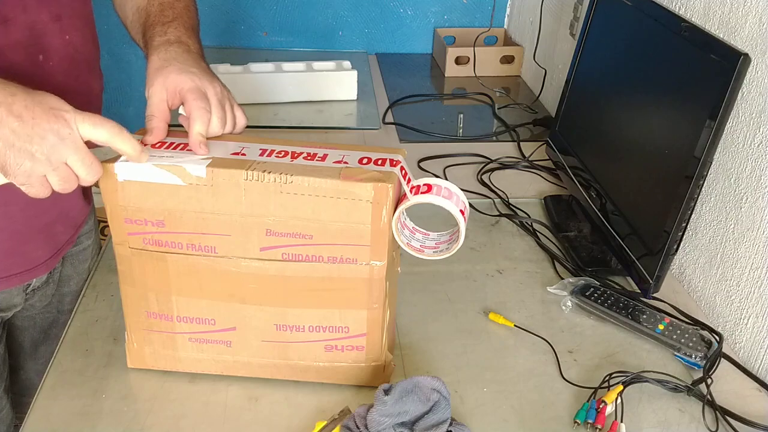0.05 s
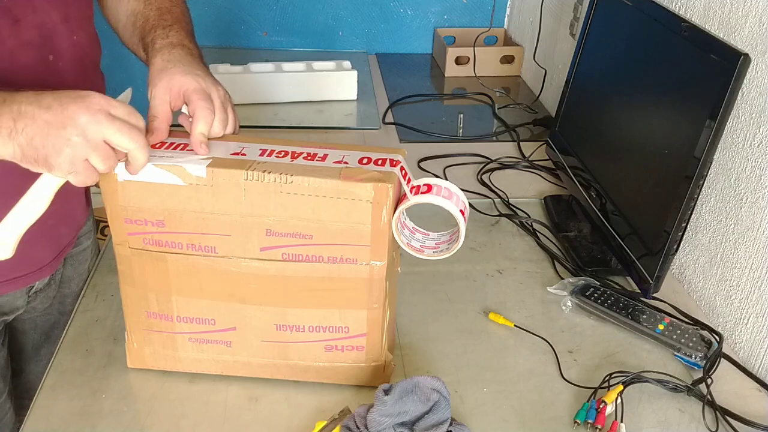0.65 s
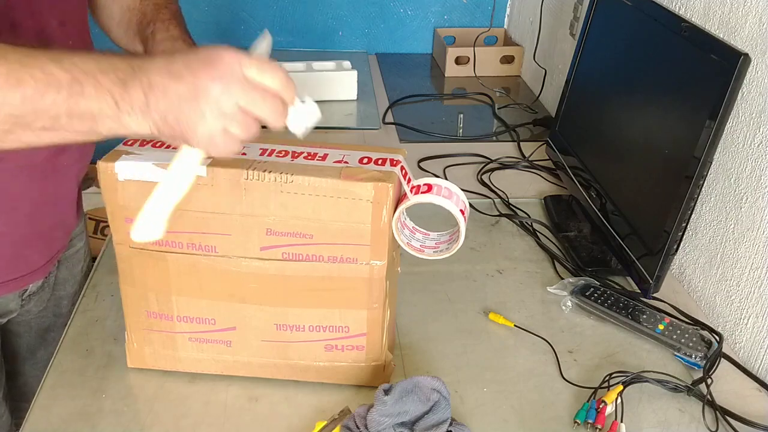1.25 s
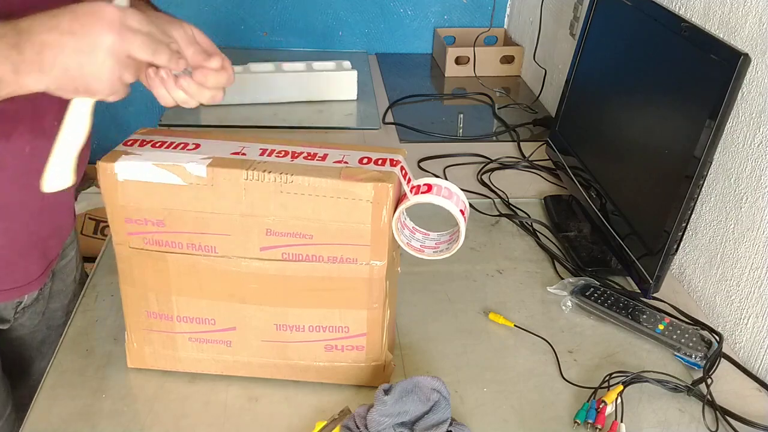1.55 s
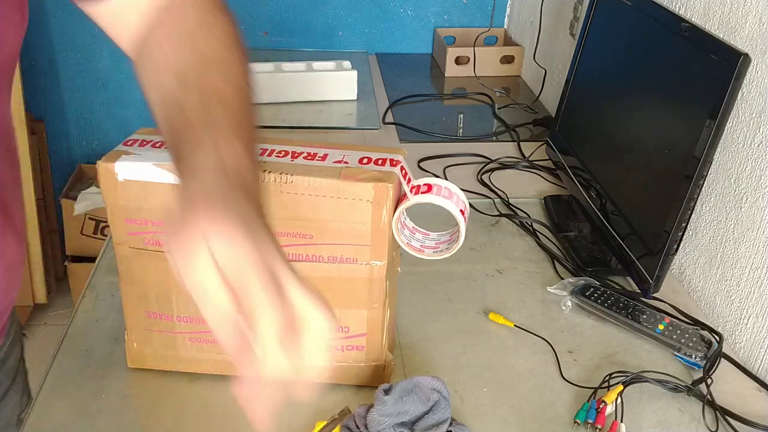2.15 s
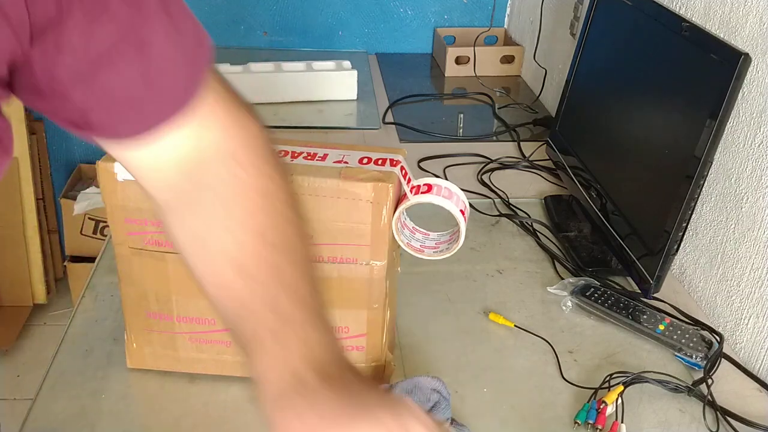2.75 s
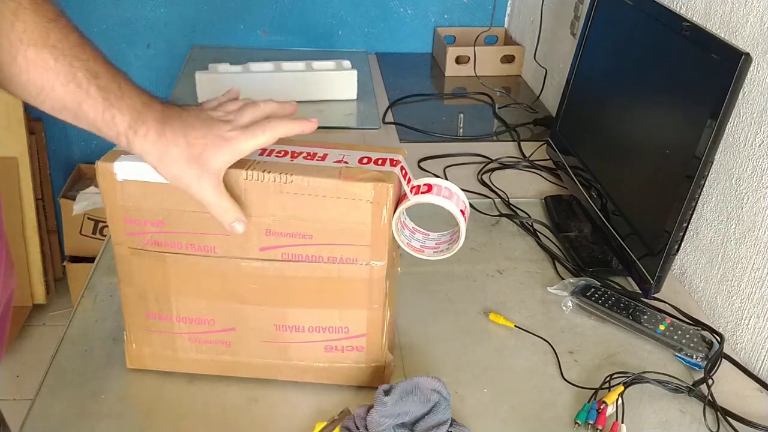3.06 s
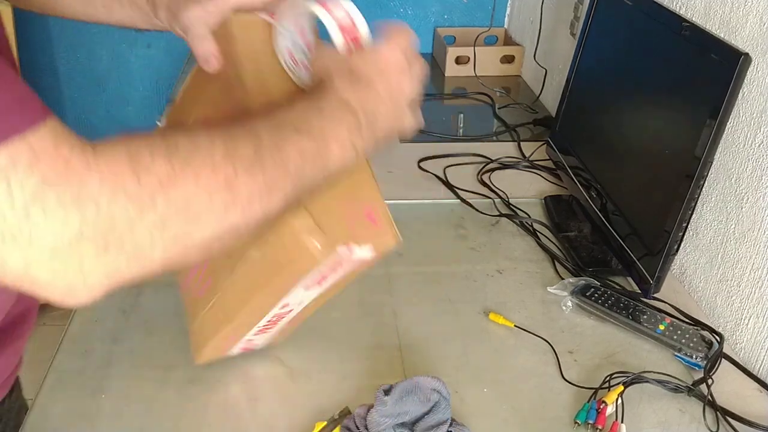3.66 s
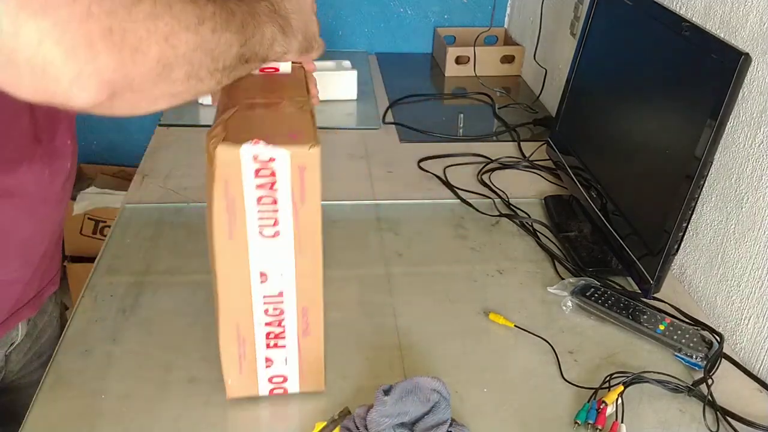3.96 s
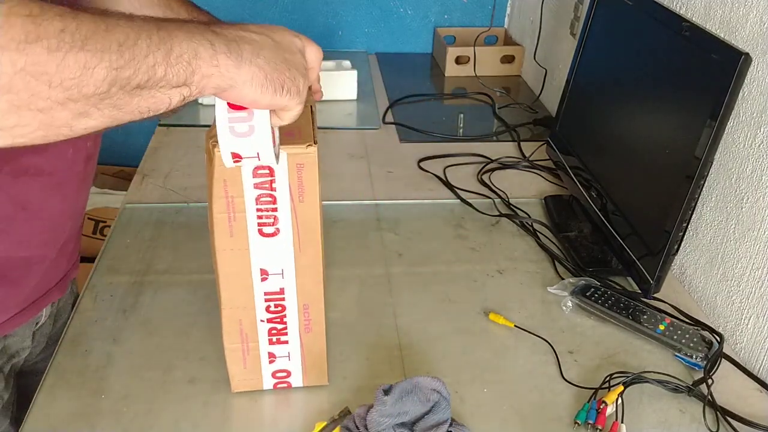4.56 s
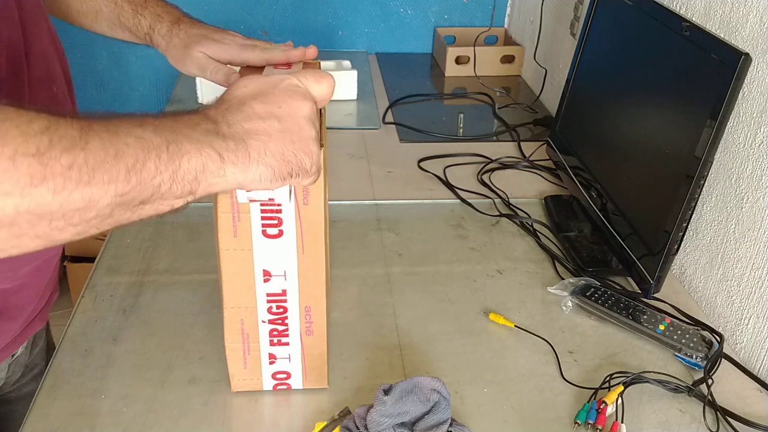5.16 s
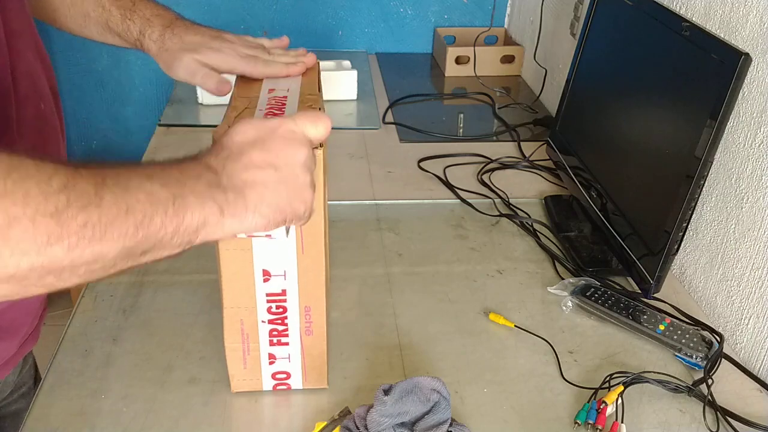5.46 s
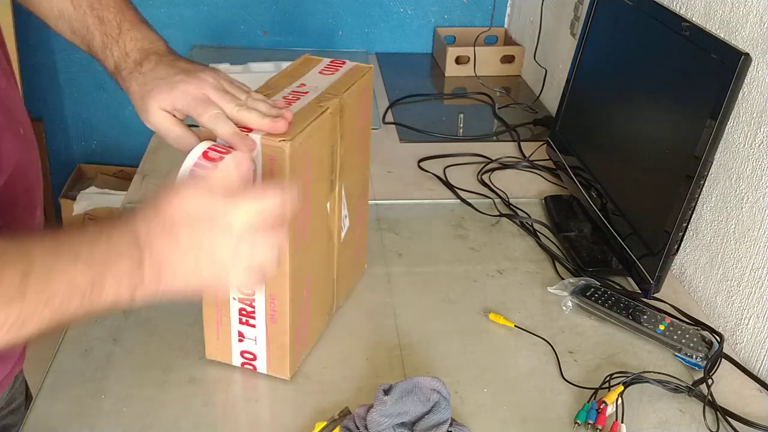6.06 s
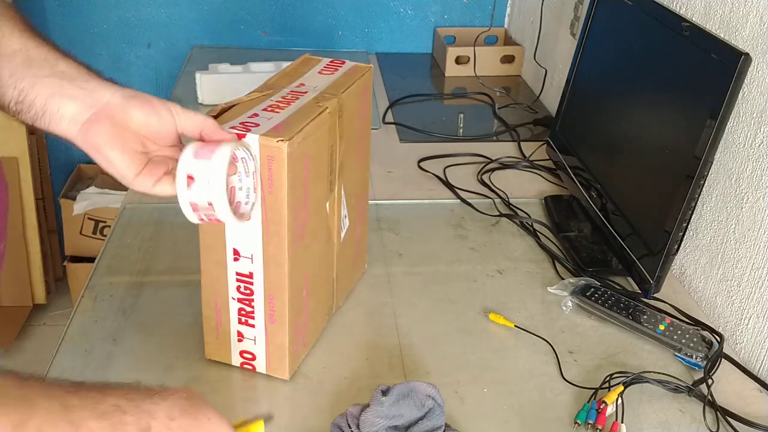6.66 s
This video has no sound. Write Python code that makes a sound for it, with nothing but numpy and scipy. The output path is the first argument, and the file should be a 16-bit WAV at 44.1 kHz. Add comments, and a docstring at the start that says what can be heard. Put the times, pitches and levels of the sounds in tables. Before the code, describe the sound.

Close up in a small room with a faint hush, hands rub lightly on a cardboard box, and a barely audible distant tone sinks at about 0.5 seconds. Packing tape peels softly around 1 second. From 1.5 seconds a cutter scrapes faintly, clicks at 2.2, then clatters and slides on the table between 2.7 and 3.3. The box is lifted and handled with hollow bumps and rustles from 3.4 to 4. The tape then comes off its roll in a loud half-second rasp that rises in pitch. Hands press and rub it onto the card until about 5. Short, sharp rips come at 5.1, 5.2 and 5.6. The box drags with a brief low judder around 5.7, followed by another squealing tape pull until 6.1. Softer rubbing, crisp snaps and two small rips continue to about 6.8 seconds.

```python
"""A table in a small room: packing tape is picked at, peeled off its roll and pressed onto a cardboard box.
Glue lets go in dense tiny slips and sharp snaps; each shakes the box air, its panels and the tape film.
Hands rub the card. A cutter scrapes and clatters; the box is lifted and judders over the table top.
Behind: a faint far tone and room hush. Heard from close by through two spaced ports."""
import sys
import numpy as np
from scipy import signal
from scipy.fft import rfft, irfft, next_fast_len
from scipy.io import wavfile

SR = 44100
rng = np.random.default_rng(int(sys.argv[2]) if len(sys.argv) > 2 else 0)


def pcm_store(signal):
    """Save signal as 16-bit PCM."""
    levels = np.round(np.clip(np.atleast_2d(signal), -1, 1) * 32767)
    wavfile.write(sys.argv[1], SR, levels.astype(np.int16).T)


N = 300315
TIME_S = np.arange(N) / SR

# Levels are relative. air, panel, film: drive into box air, box panels, tape film.
# Tape pulls: start/s, end/s, air/dB, panel/dB, film/dB, swell/(dB/s), sizzle/dB
TAPE_PULLS = [(0.911, 1.232, -54.5, -49, -56.5, 7, 13.5), (3.97, 4.479, -42.5, -30.5, -31, 1, 4),
              (5.113, 5.168, -34, -30.5, -34, -62, 5), (5.188, 5.246, -38, -27, -31, -87, 2.5),
              (5.557, 5.622, -39, -48, -40.5, -80, 6.5), (5.831, 5.909, -47, -37, -35, -30, 6.5),
              (5.926, 6.089, -50, -40.5, -34, 33, -3), (6.605, 6.662, -45.5, -39, -37, -78, 5),
              (6.779, 6.82, -43, -33.5, -37.5, 0, 8.5)]
# Rasps of taut tape or sliding cutter: start/s, end/s, f_start/Hz, f_end/Hz, half-width/Hz, level/dB
RASP_GLIDES = [(0.0, 0.155, 632, 571, 110, -63.5), (0.374, 0.388, 1180, 1127, 120, -45),
               (0.923, 1.23, 1012, 1062, 222, -44.5), (1.59, 1.625, 1200, 1097, 152, -52),
               (1.819, 1.923, 1638, 1800, 180, -56), (2.007, 2.217, 1260, 1413, 130, -67),
               (2.32, 2.538, 1595, 1472, 168, -65), (2.328, 2.537, 3100, 2910, 262, -62),
               (3.962, 4.026, 519, 477.5, 91, -33), (4.017, 4.172, 598, 1001, 109, -34.5),
               (4.164, 4.482, 1148, 1414, 240, -38.5), (4.199, 4.499, 3050, 3250, 402, -38.5),
               (4.935, 5.043, 873, 880, 90.5, -54), (5.19, 5.244, 1074, 949, 171, -30.5),
               (5.553, 5.626, 1450, 1330, 282, -31), (5.85, 6.028, 1396, 1498, 376, -34),
               (5.934, 6.003, 3475, 3020, 190, -36), (6.015, 6.088, 2573, 2754, 110, -31.5),
               (6.028, 6.096, 3150, 3013, 150, -35.5), (6.503, 6.555, 589, 590, 50, -43.5)]
# Tape snaps: t/s, air/dB, panel/dB, film/dB, f_spot/Hz
TAPE_SNAPS = [(0.374, -56.5, -45, -60, 1162), (1.2241, -47, -39, -41, 1400), (1.864, -80, -74, -46.5, 1690),
              (3.0351, -58, -44, -29.5, 1260), (3.1262, -32, -24, -32, 1113),
              (3.458, -55, -40.5, -51.5, 592), (3.7308, -65, -32.5, -36, 610),
              (3.7932, -31, -37.5, -50, 490), (3.8869, -38, -23, -33.5, 651),
              (3.9625, -25.5, -24.5, -38, 565), (4.0039, -52, -29.5, -53, 507),
              (4.6166, -37.5, -58, -50, 517), (4.7121, -36.5, -51, -55, 427),
              (4.7816, -58, -51, -35.5, 1200), (5.1172, -50, -25, -32.5, 890),
              (5.1893, -41, -27.5, -32.5, 1267), (5.392, -75, -52, -43, 2950),
              (5.5494, -42, -26.5, -27.5, 1673), (5.5641, -58, -28.5, -30, 1330),
              (5.8331, -60, -34, -30, 1400), (5.8611, -66, -30, -31, 1230),
              (5.9295, -37.5, -26.5, -27, 1714), (5.972, -58, -27.5, -30, 1217),
              (6.0172, -49, -42, -28.5, 2710), (6.32, -48, -41.5, -41.5, 617),
              (6.5099, -64, -42, -28.5, 580), (6.5973, -43.5, -35, -29.5, 1156),
              (6.7222, -65, -40, -42.5, 894), (6.7487, -56, -57, -35, 3160),
              (6.7785, -44, -37.5, -29, 1240)]
# Hand strokes: t_peak/s, rise/s, fall/s, air/dB, panel/dB, film/dB
HAND_RUBS = [(0.005, 0.03, 0.073, -52.5, -56, -66), (0.305, 0.013, 0.085, -69, -73, -66.5),
             (0.676, 0.014, 0.02, -66, -56, -56), (0.798, .025, 0.048, -66, -50.5, -55.5),
             (0.87, 0.052, 0.24, -58, -56, -62.5), (1.338, 0.018, 0.028, -66, -47.5, -61),
             (2.165, 0.045, .08, -90, -76, -64), (2.345, .03, 0.059, -86, -60, -56.5),
             (3.075, 0.052, 0.036, -58, -51, -38), (3.466, 0.013, 0.075, -41, -51, -74),
             (3.504, 0.075, 0.14, -59, -49.5, -56), (3.811, 0.093, 0.053, -40.5, -44, -57),
             (3.92, 0.069, 0.057, -49, -41, -48), (4.52, 0.031, 0.082, -52.5, -44, -64),
             (4.635, .04, 0.16, -42.5, -46.5, -45.5), (4.72, 0.066, 0.093, -45, -42.5, -50.5),
             (4.81, 0.035, 0.088, -49, -48, -72), (4.959, 0.012, 0.069, -70, -64, -64.5),
             (5.068, 0.026, .1, -63, -53, -55.5), (5.35, 0.044, 0.081, -61.5, -53.5, -77),
             (5.45, 0.056, 0.16, -64, -50, -53), (5.54, 0.032, 0.012, -46, -40, -51),
             (6.17, 0.14, 0.18, -62, -50.5, -58.5), (6.326, 0.076, 0.043, -53, -51.5, -55),
             (6.376, 0.014, 0.029, -45.5, -48.5, -72), (6.458, 0.033, 0.12, -50.5, -52.5, -65.5),
             (6.72, .04, 0.042, -53.5, -54, -55)]
# Cutter clicked shut and dropped: t/s, air/dB, panel/dB, film/dB, f_spot/Hz
CUTTER_CLACKS = [(1.594, -93, -56.5, -39.5, 3370), (1.7862, -74, -56, -39.5, 3170),
                 (2.2256, -48, -28.5, -27, 2523), (2.7559, -66, -40, -52, 740),
                 (2.7805, -34, -23, -25, 1283), (3.0053, -44, -19.5, -24, 1310),
                 (3.0116, -54, -21, -23.5, 1350), (3.1045, -38, -30, -28.5, 1140),
                 (3.1652, -47, -27, -33, 930), (3.2619, -45, -30, -43, 1140)]
# Cutter slides: start/s, end/s, air/dB, panel/dB, film/dB, swell/(dB/s)
CUTTER_SCRAPES = [(1.526, 1.69, -83, -86, -52, -53), (1.708, 1.91, -81, -74, -55, 0),
                  (1.974, 2.23, -91, -81.5, -75, 54), (2.105, 2.126, -92, -65.5, -45, -2),
                  (2.307, 2.518, -85, -65, -50, -82), (2.74, 2.784, -67, -45, -56, -1),
                  (2.886, 3, -61.5, -55, -64, -6), (3.011, 3.219, -48, -30.5, -43.5, -8),
                  (3.258, 3.28, -45.5, -39, -49, 0)]
# Box stick-slip: t/s, slip rate/Hz, level/dB
BOX_DRAG = [(5.659, 68.5, -50), (5.691, 66, -29), (5.719, 74, -28.5), (5.748, 63.4, -23.5),
            (5.772, 68.5, -31), (5.81, 68, -33), (5.826, 114, -38)]
# Modes of box air, panels and stretched film: f/Hz, width/Hz, level/dB
AIR_MODES = [(136.6, 16, -4.5), (155, 70, 14.5), (213, 59, 0), (234, 78, 2), (341.4, 91, -3),
             (444, 390, 3.5)]
PANEL_MODES = [(493, 37, -22), (617, 71, 6), (745, 150, 9), (1010, 640, 20.5), (1273, 88, 6),
               (1710, 120, 5.5), (1800, 410, -12.5), (2380, 2100, 6.5)]
FILM_MODES = [(2480, 830, 12.5), (2950, 1600, 1), (3650, 2470, 5.5), (5320, 5100, -4.5), (7600, 2700, -9),
              (10000, 960, -14.5), (13000, 3000, -23)]
# Room decay: f/Hz, t60/s
ROOM_T60 = [(150, 0.33), (500, 0.31), (1200, 0.28), (3000, 0.31), (7000, 0.31), (14000, 0.25)]
# Room hush spectrum: f/Hz, density/dB
HUSH_SPECTRUM = [(18, -53), (30, -10), (485, 4.5), (698, 4), (1200, -4.5), (2130, -15), (2920, -12),
                 (4310, -9.5), (5300, -13.5), (15000, -11.5)]
# Channel likeness in the bass, its ripple depth higher up: f/Hz, likeness/1
PORT_LIKENESS = [(60, 0.9), (150, 0.34), (300, 0.25), (550, 0.77), (1100, 1), (2200, 0.91), (4400, 0.88),
                 (6500, 0.73), (10000, 0.48), (15000, 0)]

AIR_BAND_HZ, PANEL_BAND_HZ, FILM_BAND_HZ = (88, 475), (263, 2254), (790, 13400)
BOX_LIFT_S, TOP_HZ = 3.42, 15900


def tape_peel(parts, surge_db=2.0, surge_hz=260, tug_db=1.64, tug_hz=30):
    """The glue line lets go in quick surges of slips as the hand tugs unevenly."""
    force = slips(rate_hz=1500, scatter_db=2.5, hiss=0.28)
    force *= undb(surge_db * walk(surge_hz) + tug_db * walk(tug_hz))
    start_s, end_s, *levels_db, swell_db_per_s, sizzle_db = np.transpose(TAPE_PULLS)
    moves = [stroke(*pull, attack_s=0.0056, release_s=0.02)
             for pull in zip(start_s, end_s, swell_db_per_s)]
    pull_index = np.maximum(np.searchsorted(start_s, TIME_S) - 1, 0)
    return colour(shake(force, moves, levels_db, parts), boom_db=-5.5, sizzle_db=sizzle_db[pull_index])


def rasps(ramp_s=0.0027, trim_db=-1):
    """Slips keep a narrow resonance ringing; it glides as the free length changes."""
    out = np.zeros(N)
    for start_s, end_s, start_hz, end_hz, half_width_hz, level_db in RASP_GLIDES:
        t = np.arange(max(int((end_s - start_s) * SR), 256)) / SR
        kicks = rng.standard_normal((len(t), 2)) @ [1, 1j]
        amplitude = signal.sosfilt(signal.butter(3, half_width_hz, fs=SR, output="sos"), kicks)
        phase = 2 * np.pi * np.cumsum(np.linspace(start_hz, end_hz, len(t))) / SR
        ring = np.real(amplitude * np.exp(1j * phase))
        ramps = np.minimum(np.minimum(t, t[::-1]) / ramp_s, 1)
        at = int(start_s * SR)
        out[at:at + len(t)] += undb(level_db + trim_db) * np.sqrt(len(t)) * unit(ring) * ramps
    return out


def tape_snaps(parts):
    """Bright cracks: tape jerks free or slaps the card."""
    cracks = blows(TAPE_SNAPS, parts, crack_t60_s=0.019, tick=0.27, spot_db=-2, spot_t60_s=0.052)
    return colour(cracks, boom_db=-2, sizzle_db=6.5)


def hand_rubs(parts, grip_db=1.0, grip_hz=70):
    """Skin catches and slides on card; loose tape crinkles."""
    force = slips(rate_hz=650, scatter_db=2.0, hiss=1.0) * undb(grip_db * walk(grip_hz))
    peak_s, rise_s, fall_s, *levels_db = np.transpose(HAND_RUBS)
    moves = map(swell, peak_s, rise_s, fall_s)
    return colour(shake(force, moves, levels_db, parts), boom_db=1, sizzle_db=7.5)


def cutter_clacks(parts):
    """Blunt, dry hits of the cutter."""
    hits = blows(CUTTER_CLACKS, parts, crack_t60_s=0.037, tick=0.21, spot_db=-4.5, spot_t60_s=0.011)
    return colour(hits, boom_db=1.5, sizzle_db=-10)


def cutter_scrapes(parts, chatter_db=4.5, chatter_hz=120):
    """The cutter chatters as it slides; little treble."""
    force = slips(rate_hz=720, scatter_db=2.5, hiss=0.78) * undb(chatter_db * walk(chatter_hz))
    start_s, end_s, *levels_db, swell_db_per_s = np.transpose(CUTTER_SCRAPES)
    moves = [stroke(*slide, attack_s=0.008, release_s=0.0073)
             for slide in zip(start_s, end_s, swell_db_per_s)]
    return colour(shake(force, moves, levels_db, parts), boom_db=7, sizzle_db=-8)


def box_drag(parts, scrape_db=-19, crinkle_db=-14, jitter=0.008):
    """Near-periodic stick-slip booms the box air while the edge scrapes."""
    air, panel, film = parts
    times_s, rate_hz, level_db = np.transpose(BOX_DRAG)
    cycles = np.cumsum(np.interp(TIME_S, times_s, rate_hz) * (1 + jitter * walk(60))) / SR
    jolts = np.sqrt(N) * unit(np.diff(np.floor(cycles), prepend=0))
    boom = signal.fftconvolve(jolts * envelope(times_s, level_db), air)
    grit_db = (level_db + level_db.max()) / 2  # steadier than the boom
    grit = slips(rate_hz=470, scatter_db=3.0, hiss=0.75) * envelope(times_s, grit_db)
    scrape = signal.fftconvolve(grit, undb(scrape_db) * panel + undb(crinkle_db) * film)
    return colour((boom + scrape)[:N], boom_db=-2.5, sizzle_db=3)


def slips(rate_hz, scatter_db, hiss):
    """Tiny releases of uneven size over friction noise; rms 1."""
    sizes = undb(scatter_db * np.minimum(rng.exponential(size=N), 4)) * rng.choice([-1, 1], N)
    grains = unit(sizes * (rng.random(N) < rate_hz / SR))
    return np.sqrt(N) * unit(grains + hiss * unit(rng.standard_normal(N)))


def stroke(start_s, end_s, swell_db_per_s, attack_s, release_s):
    """Force builds, swells or sags, lets go. Returns start sample, gain."""
    at = int(start_s * SR)
    t = TIME_S[at:int((end_s + release_s) * SR)] - start_s
    ramps = np.minimum(t / attack_s, 1 - (t + start_s - end_s) / release_s)
    return at, np.clip(ramps, 0, 1) * undb(swell_db_per_s * t)


def swell(peak_s, rise_s, fall_s):
    """Up 20 dB per rise_s, down 20 dB per fall_s. Returns start sample, gain."""
    at = max(int((peak_s - 2 * rise_s) * SR), 0)
    t = TIME_S[at:int((peak_s + 2 * fall_s) * SR)] - peak_s
    return at, 10 ** np.minimum(t / rise_s, -t / fall_s)


def shake(force, moves, levels_db, parts):
    """Each move feeds the force into the parts at levels_db[part][move]."""
    gains = np.zeros((len(parts), N))
    for (at, gain), move_db in zip(moves, np.transpose(levels_db)):
        gains[:, at:at + len(gain)] += np.outer(undb(move_db), gain)
    return sum(signal.oaconvolve(force * gain, part)[:N] for gain, part in zip(gains, parts))


def blows(rows, parts, crack_t60_s, tick, spot_db, spot_t60_s, rms_window_s=0.0092, size=4096):
    """A sharp push and short crack drive the parts; the struck spot rings at its own pitch."""
    out, t = np.zeros(N + size), np.arange(size) / SR
    for start_s, air_db, panel_db, film_db, spot_hz in rows:
        push = unit(rng.standard_normal(size) * decay(t, crack_t60_s))
        push[0] += tick
        body = sum(undb(db) * unit(signal.fftconvolve(push, part)[:size])
                   for db, part in zip((air_db, panel_db, film_db), parts))
        ring = np.sin(2 * np.pi * spot_hz * t) * decay(t, spot_t60_s)
        spot = unit(bandpass(ring, (spot_hz / 2, spot_hz * 2), order=2))
        struck_db = panel_db if spot_hz < PANEL_BAND_HZ[1] else film_db
        at = int(start_s * SR)
        out[at:at + size] += body + undb(spot_db + struck_db) * spot
    return np.sqrt(rms_window_s * SR) * out[:N]


def part_response(modes, band_hz, size=4096):
    """Impulse response: damped modes, radiated within one band."""
    t = np.arange(size) / SR
    rings = sum(undb(db) * width_hz * np.exp(-np.pi * width_hz * t) * np.cos(2 * np.pi * hz * t)
                for hz, width_hz, db in modes)
    return unit(bandpass(rings, band_hz))


def colour(x, boom_db, sizzle_db, boom_hz=190, sizzle_hz=6200, held_down_db=-16):
    """Deep modes are damped until the box lifts; tearing glue adds top, blunt contact cuts it."""
    boom = signal.sosfiltfilt(signal.butter(4, boom_hz, fs=SR, output="sos"), x)
    top = signal.sosfiltfilt(signal.butter(2, sizzle_hz, "high", fs=SR, output="sos"), x)
    boom_gain = undb(boom_db) * np.where(TIME_S < BOX_LIFT_S, undb(held_down_db), 1)
    return x + (boom_gain - 1) * boom + (undb(sizzle_db) - 1) * top


def room(x, direct_db=-2, move_hz=6):
    """Moving hands and box crossfade two reflection patterns."""
    angle = np.pi / 2 * walk(move_hz)
    here, there = reflections(), reflections()
    wet = signal.fftconvolve(x * np.cos(angle), here) + signal.fftconvolve(x * np.sin(angle), there)
    return (undb(direct_db) * x + wet[:N]) / np.sqrt(undb(direct_db) ** 2 + np.sum(here ** 2))


def reflections(early_db=-7, early_t60_s=0.025, late_db=-4, build_s=0.0028, size=32768):
    """Quick table and wall reflections, then a diffuse tail."""
    t, hz = np.arange(size) / SR, np.fft.rfftfreq(size, 1 / SR)
    noise = rfft(rng.standard_normal(size))
    octave = np.round(np.log2(np.maximum(hz, 64)))
    tail = sum(irfft(noise * (octave == k)) * decay(t, log_interp(ROOM_T60, 2 ** k))
               for k in np.unique(octave))
    early = rng.standard_normal(size) * decay(t, early_t60_s) * (t > 0.001)
    return undb(early_db) * unit(early) + undb(late_db) * unit(tail * (1 - np.exp(-t / build_s)))


def far_tone(peak_s=0.555, pitch_hz=495, sag_hz_per_s=60, waver=0.009, flutter_db=4.7, octave_db=-15):
    """Faint, unsteady, sinking tone with a weak octave."""
    at, gain = swell(peak_s, rise_s=0.15, fall_s=0.32)
    hz = (pitch_hz - sag_hz_per_s * (TIME_S - peak_s)) * (1 + waver * walk(40))
    phase = 2 * np.pi * np.cumsum(hz) / SR
    level = undb(-58 + flutter_db * walk(35)) * np.pad(gain, (at, N - at - len(gain)))
    return np.sqrt(2) * level * (np.sin(phase) + undb(octave_db) * np.sin(2 * phase))


def room_hush(gain_db=-77.5):
    """Steady shaped noise."""
    shape = undb(log_interp(HUSH_SPECTRUM, np.fft.rfftfreq(N, 1 / SR)))
    hush = irfft(rfft(rng.standard_normal(N)) * shape, N)
    return undb(gain_db) * np.sqrt(N) * unit(hush)


def ports(sum_field, difference_field, ripple_hz=2160, left_db=-0.66, left_top_db=-3):
    """Two spaced ports: channels swing between like and opposite phase along frequency."""
    size = next_fast_len(N + SR // 10)
    hz = np.fft.rfftfreq(size, 1 / SR)
    swing = np.where(hz < ripple_hz / 2, 1, -np.cos(2 * np.pi * hz / ripple_hz))
    likeness = np.clip(log_interp(PORT_LIKENESS, hz), 0, 0.98) * swing
    mid = rfft(sum_field, size) * np.sqrt((1 + likeness) / 2)
    side = 1j * rfft(difference_field, size) * np.sqrt((1 - likeness) / 2)  # leads by a quarter cycle
    left_gain = undb(left_db + left_top_db * (hz / TOP_HZ) ** 2)
    return np.array([irfft((mid + side) * left_gain, size), irfft(mid - side, size)])[:, :N]


def undb(db):
    """dB to gain."""
    return 10 ** (np.asarray(db) / 20)


def unit(x):
    """Scale to energy 1."""
    return x / np.sqrt(np.sum(x ** 2))


def log_interp(points, hz):
    """Read (f/Hz, value) points on a log frequency axis."""
    points_hz, values = np.transpose(points)
    return np.interp(np.log(np.maximum(hz, 1)), np.log(points_hz), values)


def envelope(times_s, level_db):
    """Gain along a dB curve; zero outside it."""
    return undb(np.interp(TIME_S, times_s, level_db)) * (TIME_S >= times_s[0]) * (TIME_S <= times_s[-1])


def decay(t, t60_s):
    """Exponential, -60 dB at t60_s."""
    return np.exp(-np.log(1000) * t / t60_s)


def walk(rate_hz):
    """Smooth random curve, spread near 1."""
    knots = rng.standard_normal(N // 20)
    return np.interp(TIME_S * rate_hz, np.arange(len(knots)), knots)


def bandpass(x, band_hz, order=4):
    """Causal Butterworth band-pass."""
    sos = signal.butter(order, np.minimum(band_hz, SR / 2 - 100), "band", fs=SR, output="sos")
    return signal.sosfilt(sos, x)


def scene():
    """Handling sounds share one box, tape and room."""
    parts = (part_response(AIR_MODES, AIR_BAND_HZ), part_response(PANEL_MODES, PANEL_BAND_HZ),
             part_response(FILM_MODES, FILM_BAND_HZ))
    drag = box_drag(parts)
    tape = tape_peel(parts) + rasps() + tape_snaps(parts)
    handling = tape + hand_rubs(parts) + cutter_scrapes(parts) + cutter_clacks(parts) + drag
    ahead, sideways = room(handling), room(handling)
    return undb(-1.5) * ports(ahead + room_hush() + far_tone(), sideways + room_hush())


def record(dry):
    """Steep low-pass at TOP_HZ."""
    return signal.sosfilt(signal.ellip(10, 0.2, 80, TOP_HZ, fs=SR, output="sos"), dry)


dry = scene()
out = record(dry)
pcm_store(out)
```